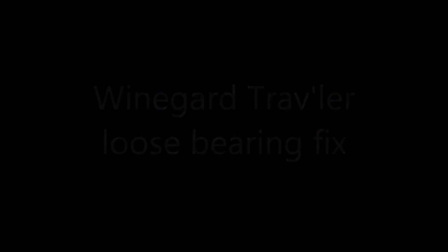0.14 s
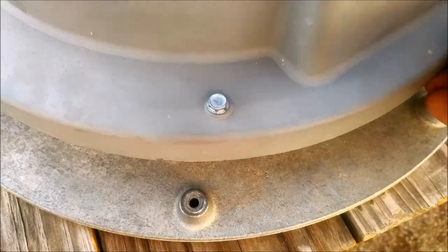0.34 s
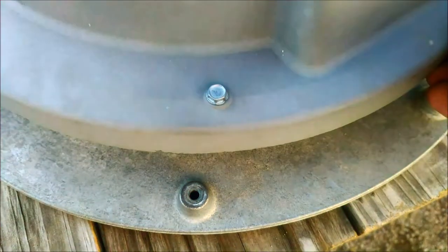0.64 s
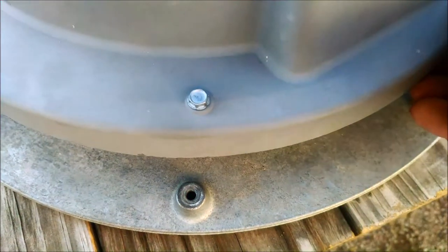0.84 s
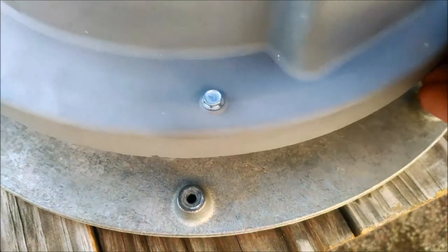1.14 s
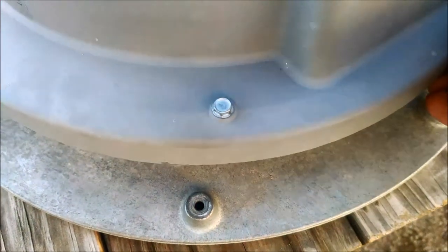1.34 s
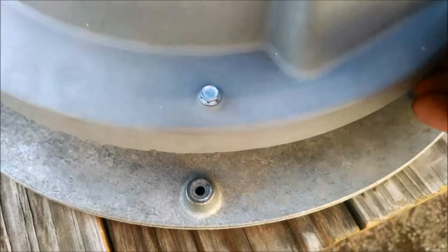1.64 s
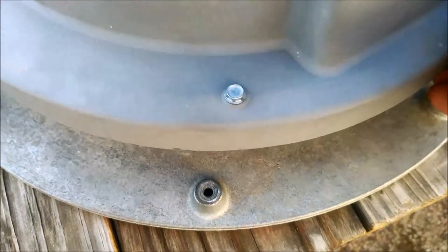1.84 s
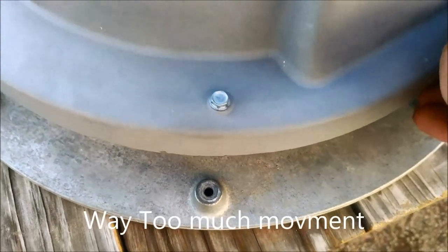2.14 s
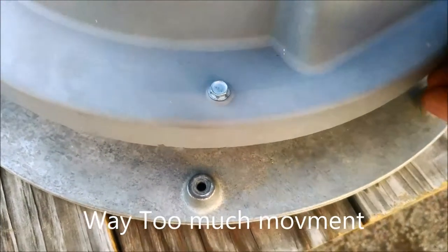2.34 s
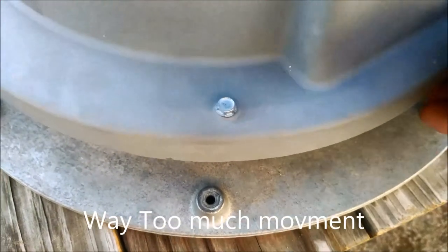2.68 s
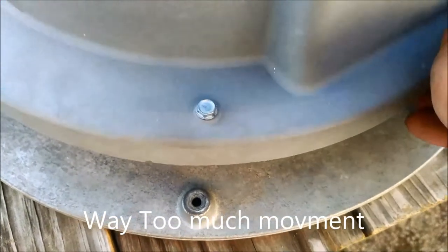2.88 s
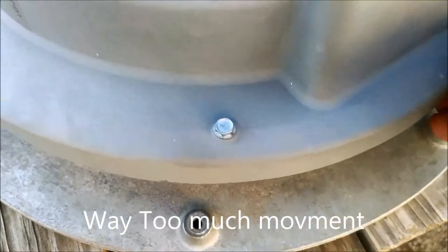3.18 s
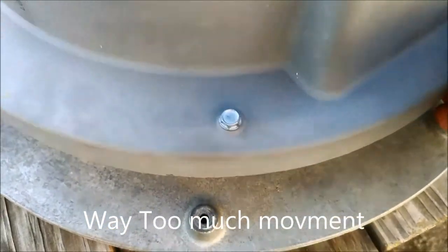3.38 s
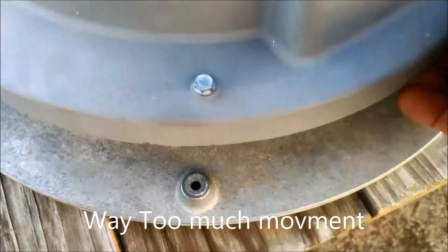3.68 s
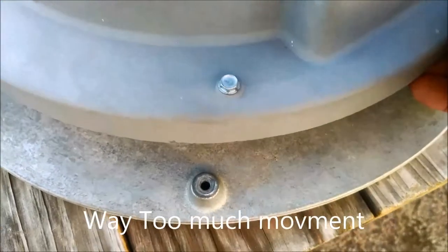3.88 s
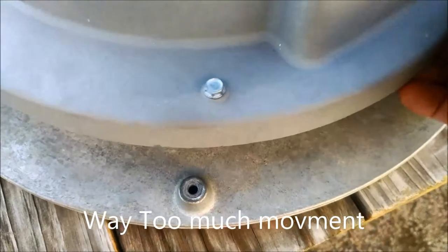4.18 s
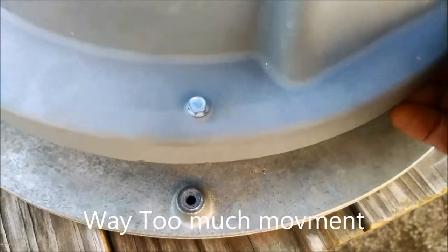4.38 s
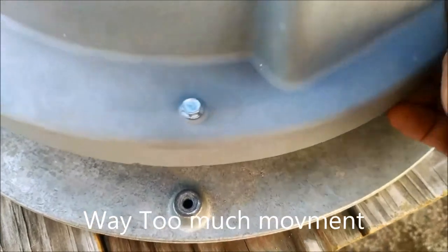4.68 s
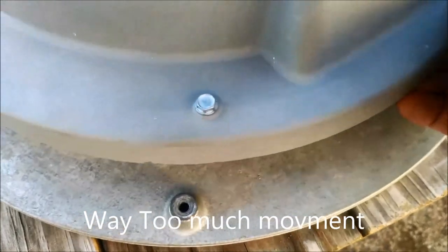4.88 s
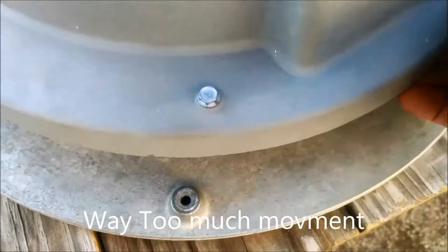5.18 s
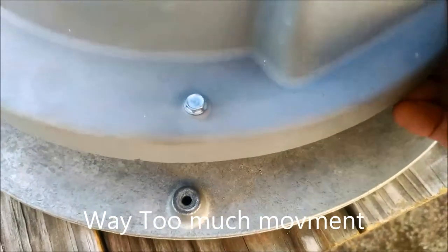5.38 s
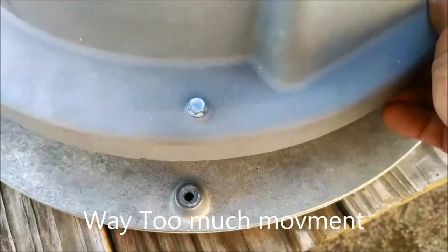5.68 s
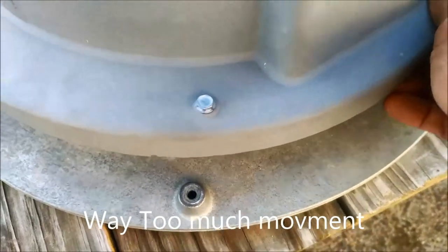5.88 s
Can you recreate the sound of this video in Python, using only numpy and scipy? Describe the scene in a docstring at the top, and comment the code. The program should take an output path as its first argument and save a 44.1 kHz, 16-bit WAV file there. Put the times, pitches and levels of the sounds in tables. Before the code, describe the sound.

Close and dry outdoors: loose metal parts knock back and forth inside a heavy housing. Each rock has a quick scrape, a bright clack, a chatter and a click into place, while deck boards thud softly. The rocking starts slow and uneven, then doubles in pace and gets louder. Thin dry friction hiss comes and goes over low rumble.

```python
"""A loose bearing knocks against its stop in a cast metal mount that a hand rocks on a wooden deck outdoors,
slowly at first and then twice as fast. Each rock scrapes the balls across the play, knocks, chatters and seats:
bursts of contacts drive the ringing modes of the housing. The deck adds decaying low modes and shudder noise,
the dry race hisses in narrow noise bands on a moving pitch, and filtered noise makes the low rumble and open air."""
import sys
import numpy as np
from scipy import signal
from scipy.fft import rfft, irfft
from scipy.io import wavfile
from scipy.ndimage import uniform_filter1d

SR = 44100
rng = np.random.default_rng(int(sys.argv[2]) if len(sys.argv) > 2 else 0)


def to_wav(s):
    """Save 16-bit WAV."""
    ch = np.atleast_2d(s).T  # columns
    pcm = np.round(np.clip(ch, -1, 1) * 32767)  # PCM
    wavfile.write(sys.argv[1], SR, pcm.astype(np.int16))


N = 265482
TIME = np.arange(N) / SR
RING = TIME[:SR // 2]  # time axis of one ring, s
LEAD_S = .006  # a blow's buffer starts this long before its main contact


def undb(db):
    """Decibels to gain."""
    return 10 ** (np.asarray(db) / 20)


def unit(x, span_s=None):
    """Scale to rms 1, judged over the first span_s seconds or over all."""
    head = x if span_s is None else x[:int(span_s * SR)]
    return x / np.sqrt(np.mean(head ** 2) + 1e-18)


def fade(t60):
    """Exponential decay over the length of a ring, down 60 dB after t60 seconds."""
    return np.exp(-np.log(1000) * RING / t60)


def follow(points, where):
    """Read a breakpoint curve, with straight lines between its points."""
    return np.interp(where, *np.transpose(points))


def add(out, s, x):
    """Mix x into out from time s."""
    i = int(s * SR)
    out[i:i + len(x)] += x[:len(out) - i]


def noise():
    """White noise as long as one ring."""
    return rng.standard_normal(len(RING))


def colour(x, points):
    """Causal minimum-phase filter whose gain follows (f/Hz, level/dB) points."""
    hz, db = np.transpose(points)
    size = 8192
    freqs = np.maximum(np.arange(size // 2 + 1) * SR / size, 1)
    gain = undb(np.interp(np.log(freqs), np.log(hz), db))
    # folding the cepstrum onto positive times makes the filter causal
    cepstrum = irfft(np.log(gain))
    cepstrum[1:size // 2] *= 2
    cepstrum[size // 2 + 1:] = 0
    impulse = irfft(np.exp(rfft(cepstrum)))
    return signal.fftconvolve(x, impulse)[:len(x)]


def even(x, width_hz=450):
    """Flatten the broad spectrum of a random burst, so that it drives all modes about alike."""
    spectrum = rfft(x)
    power = uniform_filter1d(np.abs(spectrum) ** 2, int(width_hz * len(x) / SR))
    return irfft(spectrum / np.sqrt(power + 1e-18), len(x))


def walk(rate):
    """Smooth random wandering around 0, with rate new random values a second."""
    hold = int(SR / rate)
    steps = np.repeat(rng.standard_normal(N // hold + 1), hold)
    return 0.71 * uniform_filter1d(steps, hold)[:N]


# the bearing reaches its stop, on a push and on a pull by turns, then drops into its seat; levels are relative:
# [t/s, knock level/dB, brightness/dB, delay of the seating/s, seating level/dB]
KNOCKS = [(0.766, -15.5, -1, .0493, -15.5), (1.14, -18, -2, .0354, -25), (1.496, -14.5, 0, .034, -25),
          (1.795, -19, -0.5, .041, -26), (2.118, -14, -2.5, .029, -19.5), (2.38, -19, -2, .047, -28.5),
          (2.708, -14, 1, .036, -19), (3.035, -18, 5, .047, -42), (3.518, -15, 2, .0573, -11.5),
          (3.786, -18.5, 2.5, .049, -18), (4.042, -14.5, -1, .029, -16), (4.191, -10.5, 3.5, .038, -18.5),
          (4.368, -18, 0, .03, -19.5), (4.522, -13, 0, .03, -33), (4.707, -13, 2.5, .014, -28),
          (4.848, -11, 3.5, .015, -14), (5.0, -11, 6.5, .04, -24), (5.147, -11.5, 0.5, .03, -42),
          (5.305, -17.5, 3.5, .038, -20.5), (5.458, -15.5, 2, .037, -24), (5.623, -15.5, -4.5, .029, -22),
          (5.763, -17.5, 6, .037, -19.5), (5.923, -20, 3.5, .02, -24)]


def knocks(chatter_trim_db=-2.5, bright_db=3.0, hollow_db=4, ping_hz=3250):
    """The bearing hits its stop, then chatters while the balls settle."""
    out = np.zeros(N)
    for index, (s, db, bright, *_) in enumerate(KNOCKS):
        way = stroke(index, s)
        knock = blow(s, bright + bright_db, edge_db=-5.5, spread_s=0.0026, others_db=0)
        # the direction and pace of the stroke tilt the upper cluster of modes
        knock = colour(knock, [(2500, 0), (ping_hz, way["ping_db"]), (4500, 0)])
        add(out, s - LEAD_S, undb(db - .25 * way["ping_db"]) * knock)

        settling = np.exp(-(RING / way["chatter_s"]) ** 4)
        rattle = strike(grains(900, 9.7) * settling, s, bright_db=0)
        # the seated bearing passes more of the low notes to the housing
        rattle = colour(rattle, [(700, hollow_db), (1000, 0)])
        add(out, s + .012, undb(way["chatter_db"] + chatter_trim_db) * unit(rattle, way["chatter_s"]))
    return out


def rebounds(rebound_bright_db=-6, seat_trim_db=-1.5, seat_bright_db=-4, spread_s=.0012, firm_db=-15,
             blurring=0.13):
    """After each knock the bearing bounces once, then drops into its seat: a clean click, or a rattle if soft."""
    out = np.zeros(N)
    for index, (s, db, bright, seat_s, seat_db) in enumerate(KNOCKS):
        way = stroke(index, s)
        bounce = blow(s, bright + rebound_bright_db, 0, spread_s, others_db=-11.5)
        add(out, s + way["rebound_s"] - LEAD_S, undb(db + way["rebound_db"]) * bounce)

        softness_db = max(firm_db - seat_db, 0)
        seat = blow(s, seat_bright_db, 0, spread_s * (1 + blurring * softness_db), others_db=-5)
        add(out, s + seat_s - LEAD_S, undb(seat_db + seat_trim_db) * seat)
    return out


def slides(edge_db=-9, rasp_db=4, rasp_hz=3300, low_db=-5, typical_db=-15, following=.4):
    """The balls scrape across the play until the stop, a dense run of contacts, louder before a hard knock."""
    out = np.zeros(N)
    for index, (stop_s, db, *_) in enumerate(KNOCKS):
        way = stroke(index, stop_s)
        s = stop_s - way["slide_s"]
        moving = RING < way["slide_s"]
        onset = 1 - np.exp(-RING / way["slide_rise_s"])
        force = even(grains(8000, 2.05) * moving) * moving * onset
        scrape = strike(force, s, way["slide_bright_db"], edge_db)
        scrape = colour(scrape, [(700, low_db), (2000, 0), (rasp_hz, rasp_db), (6500, 0)])
        level_db = way["slide_db"] + following * (db - typical_db)
        add(out, s, undb(level_db) * unit(scrape, way["slide_s"]))
    return out


# a push slides in abruptly, a pull eases in and chatters longer; pairs are (slow rocking, fast rocking):
# [ping/dB, slide length/s, slide level/dB, slide brightness/dB, slide rise/s,
#  chatter length/s, chatter level/dB, rebound delay/s, rebound level against the knock/dB]
PUSH = dict(ping_db=(4, -1), slide_s=(.015, .0135), slide_db=(-29, -20), slide_bright_db=(8, 4.5),
        slide_rise_s=0.00069, chatter_s=(.032, 0.017), chatter_db=(-49, -21),
        rebound_s=0.0087, rebound_db=-6.5)
PULL = dict(ping_db=(-3, -4), slide_s=(.014, 0.013), slide_db=(-28, -27.5), slide_bright_db=(1, 0),
        slide_rise_s=0.0041, chatter_s=(0.062, 0.029), chatter_db=(-30.5, -23.5),
        rebound_s=.0085, rebound_db=-3.5)
# pace of the rocking: [t/s, pace from 0 slow to 1 fast]
PACE = [(3.6, 0.021), (4.1, 1)]


def stroke(index, s):
    """How the index-th rock moves: a push or a pull by turns, blended from slow to fast at time s."""
    pace = follow(PACE, s)
    way = PULL if index % 2 else PUSH
    return {name: np.interp(pace, (0, 1), value) if np.ndim(value) else value
            for name, value in way.items()}


def grains(rate, spread_db):
    """Tiny contacts of uneven size and random sign, about rate of them a second."""
    chance, size = rng.random(len(RING)), noise()
    sign = rng.choice([-1, 1], len(RING))
    return (chance < rate / SR) * sign * undb(spread_db * size)


def blow(s, bright_db, edge_db, spread_s, others_db):
    """One firm contact amid those of the other balls, just before and behind it; starts LEAD_S early."""
    lead = int(LEAD_S * SR)
    force = undb(others_db) * grains(6000, 1.77) * np.exp(-np.abs(RING - LEAD_S) / spread_s)
    force[lead] += 1
    ring = strike(even(force) * fade(0.36), s, bright_db, edge_db)
    # rms 1 over the 5 ms from the firm contact
    attack = ring[lead:lead + int(.005 * SR)]
    return ring / np.sqrt(np.mean(attack ** 2))


# how the hand's lean on the mount fills out or thins the low notes of each blow: [t/s, level/dB]
WEIGHT = [(.7, -4.5), (2.2, -3), (3.4, -1.5), (4.0, 3.5), (4.8, 7.5), (5.3, 1), (6.02, 3)]


def strike(force, s, bright_db, edge_db=0):
    """A contact force rings the housing; the hand's weight at time s sets the low notes, hardness the treble."""
    ring = signal.fftconvolve(force, housing())[:len(RING)]
    return colour(ring, [(620, follow(WEIGHT, s)), (1400, 0), (2300, 0),
                         (5000, bright_db), (9000, bright_db + edge_db)])


# strongest modes of the housing, levels relative: [f/Hz, level/dB, t60/s]
HOUSING_MODES = [(480, -42.5, 0.14), (683.8, -12, 0.15), (747, -21, 0.18), (1320, -38, 0.082),
                 (1439, -4.5, 0.12), (1562, -7, 0.16), (1823.5, 5, 0.081), (2017, 1, 0.027),
                 (2030, 3, 0.025), (2328, 4.5, 0.034), (3119, 6.5, 0.026), (3232, 7.5, 0.023),
                 (3550, -7, 0.051), (4096, 0, 0.035), (4410, -3, 0.03), (5290, -1.5, 0.024),
                 (6010, -5.5, 0.031), (7500, -6, 0.021), (8240, -15, .11), (8780, -19.5, 0.11)]
# the housing's many weaker modes, as one relative spectrum: [f/Hz, level/dB]
HOUSING_SPECTRUM = [(150, -15.5), (280, -22), (500, -41), (700, -20), (930, -28.5), (1200, -7.5),
                    (1650, -7), (2000, 1.5), (2550, -12.5), (3150, -9), (4600, -22), (6200, -20.5),
                    (9500, -35.5), (13000, -41), (15500, -69.5)]


def housing(modes_db=-5, scatter_t60=0.013, tail_db=-9, tail_t60=0.26, detune=0.0095, vary_db=3.5):
    """Response to one blow: a crack, waves scattering through the casting, its modes and a dense ring."""
    modes = np.zeros(len(RING))
    for hz, db, t60 in HOUSING_MODES:
        # every contact point weights and tunes the modes a little differently
        level = undb(db + vary_db * rng.standard_normal())
        tuned_hz = hz * (1 + detune * rng.standard_normal())
        modes += level * fade(t60) * np.sin(2 * np.pi * (tuned_hz * RING + rng.random()))
    scatter = unit(noise() * fade(scatter_t60))
    tail = unit(noise() * fade(tail_t60))
    crack = unit((RING == 0).astype(float))
    dense = unit(even(crack + scatter)) * fade(0.71) + undb(tail_db) * tail
    return unit(colour(dense, HOUSING_SPECTRUM)) + undb(modes_db) * unit(modes)


# stray taps of the balls between knocks, before filtering: [t/s, level/dB, brightness/dB]
TAPS = [(2.2816, -44.5, -31), (2.346, -45, -8), (2.6425, -38.5, 16.5), (2.9538, -50.5, -12),
        (3.4932, -34, -3), (3.982, -26.5, -6.5), (4.0223, -31, -9), (4.32, -22, 2), (4.6666, -30, -11),
        (4.8269, -32, 19), (4.9734, -34, -11), (5.1247, -30, 2), (5.272, -33.5, -15), (5.6922, -27, -5),
        (5.8785, -34, 1)]


def taps(bright_db=-2, firm_db=-26, dulling=0.47, spread_s=0.0026, blurring=0.044, low_db=-12, top_db=-9):
    """Stray taps, weak in lows and top; the lighter the touch, the duller and more drawn out the contact."""
    out = np.zeros(N)
    for s, db, bright in TAPS:
        softness_db = max(firm_db - db, 0)
        dull_db = -dulling * softness_db
        tap = blow(s, bright + bright_db + dull_db, dull_db, spread_s * (1 + blurring * softness_db), others_db=0)
        tap = colour(tap, [(750, low_db), (1150, 0), (4200, 0), (5200, top_db)])
        add(out, s - LEAD_S, undb(db) * tap)
    return out


# modes of the deck under the mount, levels relative: [f/Hz, level/dB, t60/s]
DECK_MODES = [(87.4, -18, .2), (119.7, 19, 0.14), (141.4, 11, 0.29), (159, -13.5, 0.067), (215.9, 1, 0.26),
              (285, -42.5, 0.12)]
# relative spectrum of the boards shuddering after a knock: [f/Hz, level/dB]
SHUDDER = [(40, -28), (85, -3.5), (125, -11.5), (172, 4), (230, -10), (320, -21.5), (500, -58.5),
           (1000, -64)]


def deck(thump_db=-25.5, shudder_db=-24.5, yielding=0.56, shudder_t60=0.34, shudder_rise_s=0.013, click_db=-18):
    """Knocks push the boards down, harder ones further; they swing back and shudder, and the seating thuds."""
    out = np.zeros(N)
    for s, db, _, seat_s, seat_db in KNOCKS:
        thump = np.zeros(len(RING))
        for hz, gain_db, t60 in DECK_MODES:
            tuned_hz = hz * (1 + 0.033 * rng.standard_normal())
            envelope = fade(t60) * (1 - np.exp(-RING / 0.0031))
            thump -= undb(gain_db) * envelope * np.cos(2 * np.pi * tuned_hz * RING)
        swelling = 1 - np.exp(-(RING / shudder_rise_s) ** 2)
        shudder = colour(noise(), SHUDDER) * fade(shudder_t60) * swelling
        boards = undb(thump_db) * unit(thump, 0.14) + undb(shudder_db) * unit(shudder, 0.054)
        add(out, s, undb(yielding * db) * boards)

        thud = colour(noise() * fade(0.034), SHUDDER)
        add(out, s + seat_s, undb(seat_db + click_db) * unit(thud, 0.01))
    return out


# how strongly the race rubs, before trim and flicker: [t/s, level/dB]
RUB = [(2.7, -83), (2.8, -53.5), (2.91, -49), (3.0, -55.5), (3.17, -50.5), (3.3, -88), (3.39, -65),
       (3.49, -55.5), (3.65, -82), (4.1, -64), (4.48, -48), (4.95, -54.5), (5.25, -78), (5.46, -41),
       (5.59, -38), (5.72, -48.5), (6.02, -57)]
# pitch of its main resonance, before the waver: [t/s, f/Hz]
RUB_PITCH = [(2.85, 5874), (3.0, 5677), (3.5, 5920), (4.48, 6150), (5.25, 5810), (5.46, 6634), (5.6, 6220)]
# side resonances of the rubbing race, levels relative: [multiple of the main f at rest, width/Hz, level/dB]
RACE = [(0.301, 200, -2.5), (.36, 300, -21), (0.54, 221.3, -1.5), (.575, 260, 2), (0.798, 293, -4.5),
        (0.872, 200, -4), (.96, 250, -2.5), (1.039, 346, -5), (1.18, 900, -11), (2.12, 1400, -13)]
RACE_REST_HZ = 5820
SIDE_FOLLOWING = 0.21  # share of the main resonance's glides that the side ones follow


def race(rub_db=2, flicker_db=2.5, own_flicker_db=2.5, grit_db=-13.5, waver=.006, firm_db=-48, spreading=.7):
    """Dry friction: a light rub sings in one resonance, a firm one wakes the others and adds grit."""
    level_db = follow(RUB, TIME)
    pitch_hz = follow(RUB_PITCH, TIME) * (1 + waver * walk(8.3))
    turns = np.cumsum(pitch_hz) / SR
    side_turns = SIDE_FOLLOWING * turns + (1 - SIDE_FOLLOWING) * RACE_REST_HZ * TIME
    others = np.zeros(N)
    for multiple, width_hz, gain_db in RACE:
        others += undb(gain_db + own_flicker_db * walk(24)) * whine(multiple * side_turns, width_hz)
    grit = unit(colour(rng.standard_normal(N), [(800, -30.5), (2000, -5), (6000, -6), (9000, -10),
                                                (13000, -11.5), (15500, -27)]))
    song = whine(turns, 110)
    share = undb(5.5 + spreading * (level_db - firm_db))
    rub = (song + share * (unit(others) + undb(grit_db) * grit)) / np.sqrt(1 + share ** 2)
    return rub * undb(level_db + rub_db + flicker_db * walk(120))


def whine(turns, width_hz):
    """A friction-driven resonance: narrow noise around a moving pitch, given as its phase in turns."""
    lowpass = signal.butter(2, width_hz / 2, fs=SR, output="sos")
    jitter = signal.sosfilt(lowpass, rng.standard_normal(N) + 1j * rng.standard_normal(N))
    return unit((jitter * np.exp(2j * np.pi * turns)).real)


def grip(s=.533, hz=335, db=-54, t60=0.05):
    """A soft bump as the hand takes hold: one low, quickly damped tone."""
    out = np.zeros(N)
    bump = np.sin(2 * np.pi * hz * RING) * fade(t60) * (1 - np.exp(-RING / 0.0022))
    add(out, s, undb(db) * unit(bump, 0.015))
    return out


# level of the low rumble, around which it wanders: [t/s, level/dB]
RUMBLE_LEVEL = [(.37, -62), (.61, -56.5), (.68, -41), (2.9, -43), (3.3, -47), (4.3, -42), (5.55, -39),
                (6.02, -44.5)]
# relative spectrum of the rumble: [f/Hz, level/dB]
RUMBLE = [(20, -23.5), (40, -7), (75, 3.5), (115, 7), (160, 0.5), (220, -19.5), (320, -35), (500, -48.5),
          (1000, -42.5)]
# relative spectrum of the open air: [f/Hz, level/dB]
AIR = [(100, -1), (350, -1), (700, 0), (2500, -0.5), (6000, -6), (12000, -9.5), (15500, -5.5)]


def outdoors(air_db=-62, swell_db=7, swell_end_s=0.421):
    """An uneven low rumble and the faint hiss of open air, briefly louder as the sound sets in."""
    rumble_db = follow(RUMBLE_LEVEL, TIME) + walk(9.1)
    rumble = unit(colour(rng.standard_normal(N), RUMBLE)) * undb(rumble_db)
    swell = swell_db * np.clip((swell_end_s - TIME) / .01, 0, 1)
    air = unit(colour(rng.standard_normal(N), AIR))
    return rumble + undb(air_db + swell) * air


def scene():
    """All sources summed to one channel, without added reverberation."""
    bearing = knocks() + rebounds() + slides() + taps()
    return (bearing + deck() + race() + grip() + outdoors())[None]


def record(dry, start_s=.37, low_cut_hz=42, ceiling=.88, top_hz=15600):
    """Silence at first; the microphone sheds deep bass, rounds the loudest peaks and cuts the top."""
    opened = np.clip((TIME - start_s) / .01, 0, 1)
    low_cut = signal.butter(2, low_cut_hz, "high", fs=SR, output="sos")
    thin = signal.sosfilt(low_cut, dry * opened)
    rounded = ceiling * np.tanh(thin / ceiling)
    top_cut = signal.ellip(10, .2, 80, top_hz, fs=SR, output="sos")
    return signal.sosfilt(top_cut, rounded)


dry = scene()
out = record(dry)
to_wav(out)
```